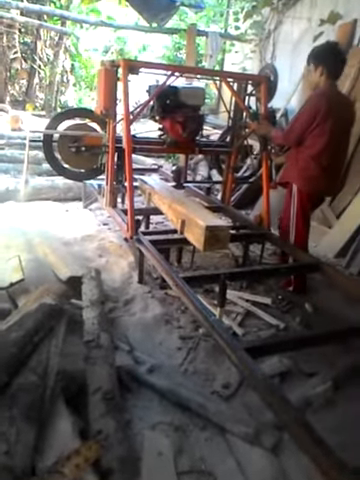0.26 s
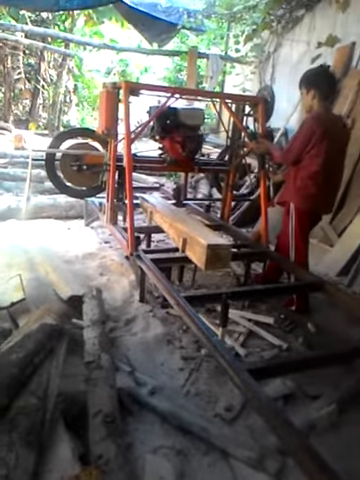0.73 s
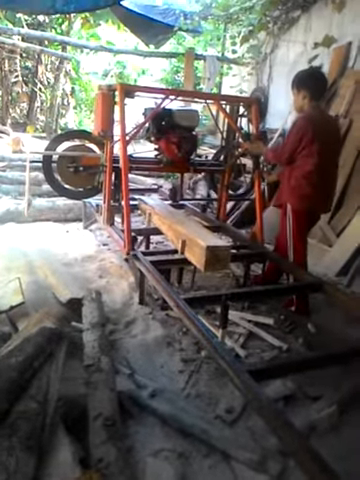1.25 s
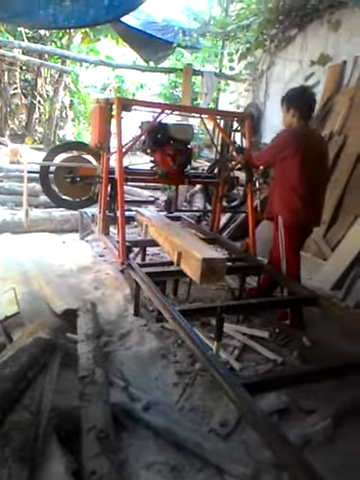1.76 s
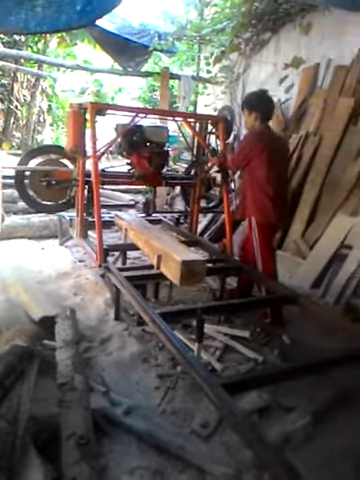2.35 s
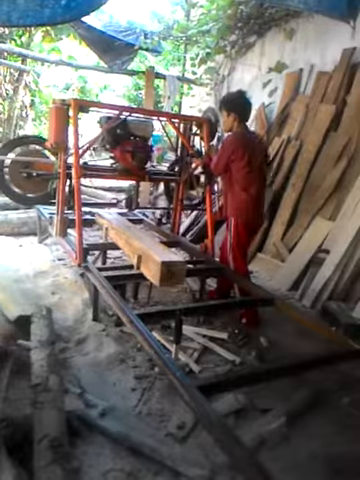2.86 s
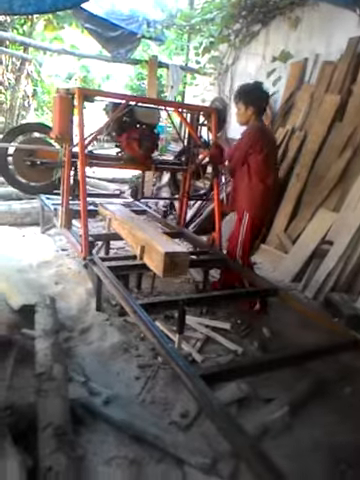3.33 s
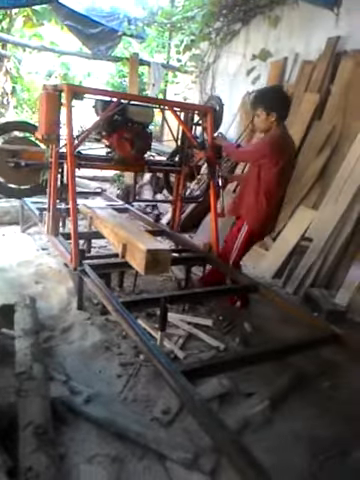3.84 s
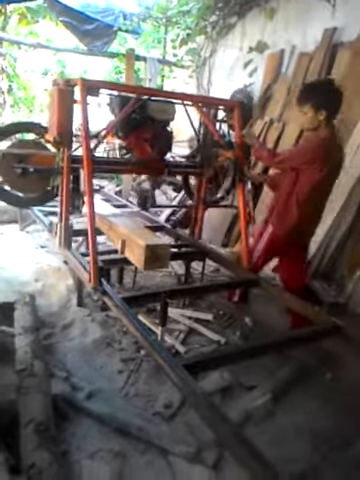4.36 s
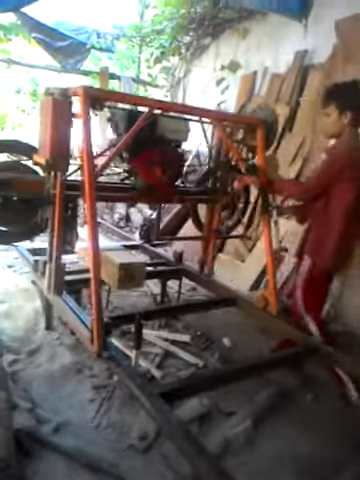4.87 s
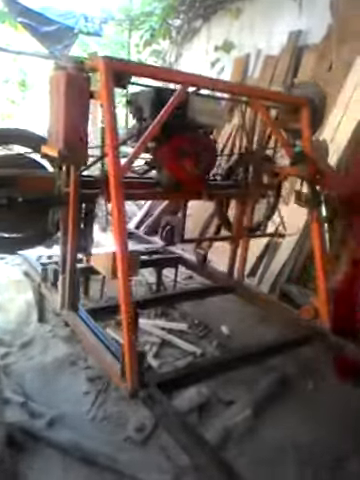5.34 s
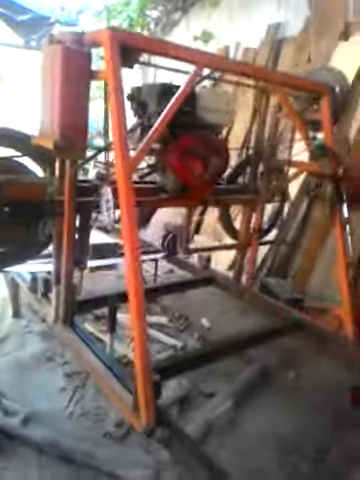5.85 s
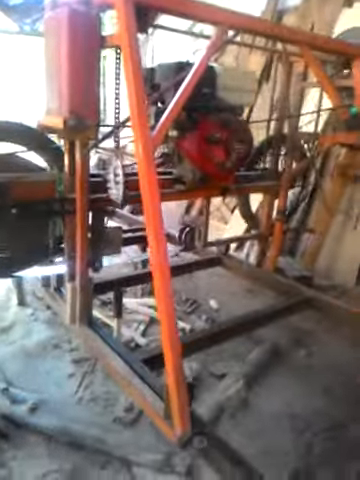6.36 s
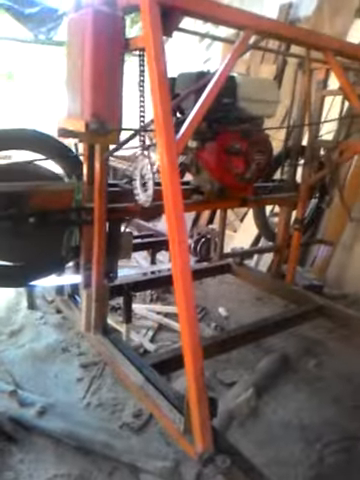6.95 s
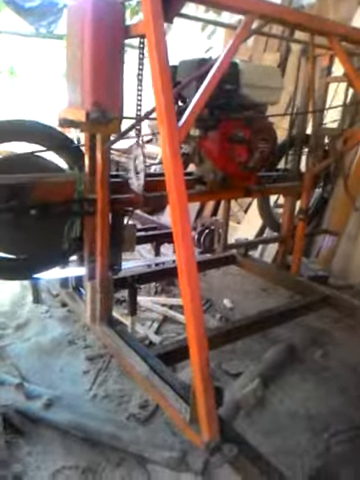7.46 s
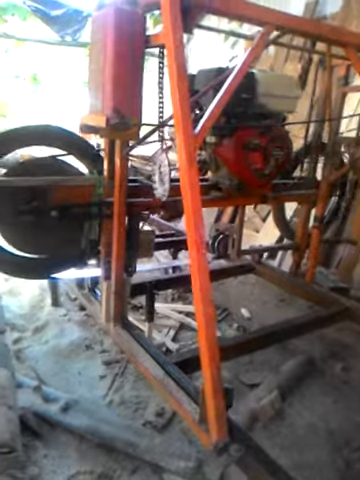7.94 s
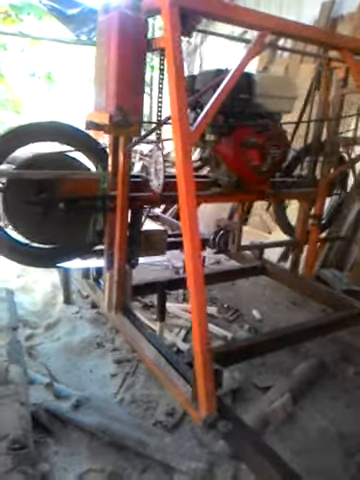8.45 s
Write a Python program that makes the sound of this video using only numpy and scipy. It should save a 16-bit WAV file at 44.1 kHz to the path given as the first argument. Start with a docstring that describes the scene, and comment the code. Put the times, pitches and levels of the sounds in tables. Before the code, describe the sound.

A thin high hiss of running steel band pulses several times a second over a low engine purr. The engine briefly revs, then eases off. Guide scrapes, a faint whine and a hollow rasp join as the machine rolls nearer, the squeal peaking harsh and bright around five seconds. It ends beside a single close microphone, pulsing more slowly, with chuffs, metallic ringing and soft frame knocks.

```python
"""In a shed, a homemade band sawmill winds down and rolls its carriage up to the microphone.
Coloured noise makes the steel band hiss and squeal through its guides, surging on every lap; bending
modes ring, guides scrape and whine, and a hollow rasp rises and sinks. Summed cosines make the petrol
engine pull, then resonant filters turn puffs into shut-throttle chuffs. Low noise rumbles the frame."""
import sys
import numpy as np
from scipy import signal
from scipy.fft import rfft, irfft
from scipy.io import wavfile
from scipy.ndimage import uniform_filter1d, minimum_filter1d

SR = 44100
rng = np.random.default_rng(int(sys.argv[2]) if len(sys.argv) > 2 else 0)


def persist_wave(psi):
    """Save psi, clipped to +-1, as 16-bit WAV."""
    counts = np.round(np.clip(psi, -1, 1) * 32767).astype(np.int16)
    wavfile.write(sys.argv[1], SR, np.atleast_2d(counts).T)


N = 383669

# Speed of the machine: (time [s], engine firings [per s], laps of the band [per s])
MACHINE_SPEED = [(0, 28.24, 6.29), (1.15, 27.92, 6.15), (1.65, 29.77, 6.555), (2.5, 26.55, 6.014),
                 (3.5, 23.96, 5.282), (5, 22.16, 5.019), (6.5, 20.19, 4.514), (7.5, 20.2, 4.278),
                 (8.7, 18.71, 4.259)]
# Place of the saw as heard from the microphone: (time [s], place [0 far, 1 facing the band, 2 beside the
# frame])
SAW_PLACE = [(0, 0), (3, 0), (3.7, .62), (4.3, 1), (5.35, 1), (5.9, 1.5), (7.1, 2.05), (8.7, 1.9)]

# Squeal of the band, following the engine at first, then rising up close: (time [s], level [dB])
SQUEAL_LEVEL = [(0.0, -27.5), (1.42, -23.5), (2.1, -27.5), (3.05, -26.5), (3.5, -24.5), (4.03, -19),
                (4.26, -19), (4.4, -15.5), (4.85, -12.0), (5.52, -11), (5.62, -14), (6.3, -13), (6.8, -11),
                (6.93, -16), (7.88, -17.5), (8.03, -16.0), (8.25, -18.0), (8.7, -16.0)]
# Pressure of the contact, relative to the squeal: (time [s], grinding [dB], fizz of the teeth [dB])
CONTACT_PRESSURE = [(0, -9, -13), (1.4, -10, -12), (3.1, -6.5, -11.5), (4.4, -8.5, -10.5), (4.9, -8.5, -10),
                    (7.3, -12, -11), (8.2, -8.7, -8), (8.7, -10.5, -11)]
# Hiss of the band from each of the three places: (frequency [Hz], relative density [dB per Hz])
HISS_FAR = [(100, -22.5), (300, -16), (520, -14.5), (750, -15), (1000, -10), (1750, -10), (2500, -17.5),
            (3800, -12), (4800, -10), (5400, -1), (6400, 0.5), (7300, -6.5), (9700, -21.5), (15500, -25)]
HISS_FACING = [(100, -31.5), (500, -25), (1000, -23.5), (1950, -11), (2500, -19.5), (3300, -14),
               (3700, -20), (4800, -8.5), (5300, -1.5), (6200, -2), (7800, -7.5), (8400, -14.5),
               (9800, -20.5), (15500, -21)]
HISS_BESIDE = [(100, -28.5), (800, -30), (1900, -20.5), (2800, -22.5), (3700, -17.5), (4800, -18.5),
               (5300, -7.5), (6250, -7.5), (6800, -10), (7600, -8.5), (8250, -21), (9100, -12.5),
               (10800, -17.5), (12000, -27.5), (15300, -17.5)]
# Resonances of the band heard from afar: (frequency [Hz], width [Hz], relative level [dB])
BAND_MODES_FAR = [(1680, 74, -10.5), (3170, 120, -19), (6530, 140, 1.5), (7330, 170, -5.5), (7970, 110, -9),
                  (9100, 340, -18)]
# Resonances of band and frame from close by: (frequency [Hz], width [Hz], relative level [dB])
BAND_MODES_NEAR = [(1990, 77, -16.5), (2230, 45, -14), (2270, 36, -20), (3060, 40, -8), (3530, 87, -6),
                   (3694, 24, -2), (3930, 100, -9), (4100, 110, -14), (4500, 97, -11), (5203, 230, -0.5),
                   (5540, 45, 4), (5816, 130, 1.5), (6055, 70, 7), (6260, 94, -1), (7200, 88, -2),
                   (7610, 42, -15), (7560, 120, -11), (7910, 33, -1.5), (8460, 36, -4.5), (8700, 210, -13),
                   (9020, 190, -5), (10840, 430, -13), (11750, 130, -18), (12100, 120, -21),
                   (13130, 230, -14), (13900, 200, -34), (15050, 400, -22)]
# Resonances that carry only to the front: (frequency [Hz], width [Hz], relative level [dB])
BAND_MODES_FACING = [(2070, 60, -16), (2834, 130, -12), (3050, 60, -10.5), (3520, 130, -6.5),
                     (3840, 88, -2.5), (4330, 100, -5), (4660, 94, -8.5)]
WELD_SURGE_DB, HALF_LAP_SURGE_DB = (1.16, 4), (0.94, 1.1)  # each (far away, beside the frame)

# Low bending ring of the band: (time [s], level [dB])
RING_LEVEL = [(1.2, -60), (1.7, -39), (3.1, -37.5), (3.3, -29), (4.1, -27.5), (4.8, -21.5), (5.45, -23.5),
              (5.9, -38), (6.75, -26), (7.6, -29), (8.7, -31)]
# Flares (+) and stalls (-) of the ring: (time [s], change [dB], half length [s])
RING_FLARES = [(3.18, 7.5, 0.026), (3.27, -5, 0.029), (3.665, 4, 0.017), (3.733, -6, 0.053),
               (4.3, -6, .015), (4.762, 2.5, .02), (6.28, 7, 0.018), (6.649, 9.5, .03), (7.003, -9, 0.092),
               (7.29, 0, 0.021), (7.627, 5, 0.032), (7.86, -3.5, 0.044), (7.995, 4.5, .02),
               (8.36, 4.5, 0.018)]
# Bending modes: (frequency [Hz], width [Hz], far [dB], facing [dB], beside [dB]), levels relative
BENDING_MODES = [(1270, 50, -18, -2, 12), (1319, 80, -14, 3, 1), (1445, 270, 1, -7, -54),
                 (1624, 70, 7, 2.5, -10), (1753, 124, -2, -1.5, -6)]

# Scrapes of the band on a guide: (time [s], peak level [dB], half length [s])
GUIDE_GRAZES = [(3.153, -27, 0.018), (3.202, -20.5, 0.016), (3.57, -30, 0.033), (4.035, -23.5, 0.035),
                (4.349, -18.5, .03)]
# Resonances of the grazed guide: (frequency [Hz], width [Hz], relative level [dB])
GUIDE_MODES = [(2860, 130, -16), (3550, 100, 7), (4120, 160, 5.5), (4660, 180, 2)]
# Whines of a guide, before their flutter: (start [s], end [s], frequency [Hz], level [dB])
GUIDE_WHINES = [(.15, .7, 4200, -36), (2.5, 3.2, 4200, -37), (3.9, 4.69, 4140, -29), (6.3, 8.7, 4415, -34)]
WHINE_FADE_S, WHINE_WIDTH_HZ = .2, 135
# Hollow rasp, before its flutter: (time [s], centre frequency [Hz], level [dB])
RASP_PATH = [(0, 600, -57), (1.3, 626, -45), (1.85, 930, -45.5), (3.9, 934, -50), (4.35, 870, -33.5),
             (5.2, 706, -34), (5.9, 596, -45.5), (8.7, 604, -48.5)]

# Exhaust, loud under throttle and again close to the engine: (time [s], level [dB])
EXHAUST_LEVEL = [(0, -40.5), (1.3, -37), (1.68, -47.5), (3.1, -44.5), (4.2, -49), (4.9, -34.5), (5.35, -35),
                 (5.7, -41), (6.65, -37.5), (7.75, -48.5), (8.0, -37.5), (8.7, -45)]
# Throttle: (time [s], share of clean firing [dB], tilt of the pulses [dB per octave])
THROTTLE_MIX = [(0, -1.5, -1), (1.0, -1.5, -.5), (1.25, -2, 1), (1.5, 3, -0.5), (1.67, -1, -8),
                (1.78, -6.5, -7.5), (3.5, -15.5, -9.5), (5.3, -12, -9), (6.3, -15, -3)]
# Exhaust harmonics under throttle: (multiple of the firing rate, level before the tilt [dB])
FIRING_ORDERS = [(2, -30), (4, -22), (5, -2.5), (7, -28), (8, -28), (9, -4), (10, 0), (11, -21), (12, -15),
                 (13, -5.5), (15, 0.5), (16, -7), (17, -7), (18, -14), (19, -5), (21, -9)]
# Silencer resonances, throttle shut:
# (frequency [Hz], width setting [Hz], far [dB], facing [dB], beside [dB]), levels relative
SILENCER_MODES = [(112.5, 7.5, -4, -3, -11), (144, 44, -2, -23, -9), (199, 42, -8, -18, -10),
                  (281.4, 21, 8.5, -16, 6), (321.4, 50, -27, 8.5, 12.5), (361, 55, -30, 1, -16),
                  (415, 23, 8.5, -6, 4), (636, 77, -31, -3, -9)]

# Dull knocks, hums and rings of the frame, and a brief engine hum near 109 Hz: # (time [s], frequency [Hz],
# width [Hz], peak level [dB], half length [s])
FRAME_KNOCKS = [(3.28, 415, 18, -44, 0.079), (3.602, 412, 15, -38, 0.083), (3.857, 203, 56, -48, .12),
                (5.247, 109, 9.3, -45, 0.2), (6.17, 52, 25, -44, .04), (6.68, 190, 130, -37.5, 0.051),
                (7.4, 414, 40, -40, 0.053), (7.766, 58, 25, -43, .03), (8.25, 1075, 150, -41, 0.45),
                (8.508, 2490, 230, -33, 0.27), (8.64, 274, 46, -33.5, 0.085)]
# Colour of the frame's steady rumble: (frequency [Hz], relative density [dB per Hz])
RUMBLE_COLOUR = [(20, -21), (35, -11), (55, -1), (90, 6), (130, -5), (200, 0), (300, 1), (600, -22)]
# Carriage rolling along its rails, before the lap wobble: (start [s], end [s], level [dB])
CARRIAGE_ROLLS = [(4.72, 6.22, -48.5), (6.55, 6.78, -45), (7.42, 7.55, -46)]
# Colour of the rolling: (frequency [Hz], relative density [dB per Hz])
ROLLING_COLOUR = [(20, -13.5), (35, -14), (55, -1), (85, 7), (120, -10), (200, -11), (400, -16), (800, -45)]
ROLL_FADE_S = 0.043
SHAKE_FAR_DB, SHAKE_NEAR_DB = -52.5, -52  # rumble of the frame, before its wobble
WOBBLE_DB = 1  # depth of the shake that the wheels give the frame once a lap

CEILING, EDGE_HZ = .92, 15560  # limiter ceiling [full scale], top of the sound [Hz]
SIZE, HOP = 4096, 1024  # noise frames [samples]
TIME = np.arange(N) / SR
FRAMES = np.arange(N // HOP + 5) * HOP / SR
BINS = np.fft.rfftfreq(SIZE, 1 / SR)


def amp(db):
    """Decibels to gain."""
    return 10 ** (np.asarray(db) / 20)


def evened(x):
    """Scales to rms 1."""
    return x / np.sqrt(np.mean(x ** 2) + 1e-20)


def steadied(x, size):
    """Friction holds a vibration near one strength: evens out its level over size samples."""
    strength = uniform_filter1d(uniform_filter1d(x ** 2, size), size)
    return x / np.sqrt(abs(strength) + 1e-12)


def follow(rows, t):
    """Each column of a curve at the times t."""
    s, *columns = np.transpose(rows)
    return [np.interp(t, s, c) for c in columns]


def by_place(far, near):
    """Glides from the far value to the near one as the saw comes close."""
    place, = follow(SAW_PLACE, TIME)
    return np.interp(place, [0, 2], [far, near])


def swell(s, half):
    """A smooth rise and fall around the moment s."""
    return np.exp(-((TIME - s) / half) ** 2)


def held(start, end, fade):
    """Fades in at start, holds, and fades out at end."""
    return (np.tanh((TIME - start) / fade) - np.tanh((TIME - end) / fade)) / 2


def bump(turns, at, width):
    """A smooth bump once in every turn."""
    distance = (turns - at + .5) % 1 - .5
    return np.exp(-(distance / width) ** 2)


def wander(rate_hz):
    """Slow random drift of rms 1, fading out above the given rate."""
    hz = np.fft.rfftfreq(N, 1 / SR)
    size = np.searchsorted(hz, 2 * rate_hz)
    spectrum = rfft(rng.standard_normal(2 ** 13))[:size]
    slow = irfft(spectrum / (1 + (hz[:size] / rate_hz) ** 4), 2 ** 13)
    return evened(np.interp(TIME, np.linspace(0, TIME[-1], len(slow)), slow))


def colour(points):
    """Power per bin of a noise colour, drawn between points on a log frequency axis."""
    hz, db = np.transpose(points)
    return amp(np.interp(np.log(BINS + 1), np.log(hz), db)) ** 2


def peak(hz, width):
    """Power per bin of a resonance with steep skirts."""
    return 1 / (1 + 2 * ((BINS - hz) / width) ** 2) ** 2


def ringing(modes):
    """Power per bin of a set of resonances."""
    return sum(amp(db) ** 2 * peak(hz, width) for hz, width, db in modes)


def noise(power):
    """Noise of steady rms 1 whose colour follows power (frames x bins)."""
    a, b = rng.standard_normal((2, len(FRAMES), len(BINS)))
    z = (a + 1j * b) * np.sqrt(power / power.sum(-1, keepdims=True))
    return evened(signal.istft(z.T, nperseg=SIZE, noverlap=SIZE - HOP)[1][:N])


def along_path(powers):
    """Blends the colours of the three places as the saw comes close."""
    place, = follow(SAW_PLACE, FRAMES)
    place = np.clip(place, 0, 2)[:, None]
    return sum(np.maximum(1 - abs(place - k), 0) * p / p.sum() for k, p in enumerate(powers))


def moving_modes(rows):
    """Resonances whose strengths depend on the place."""
    hz, width, *levels = np.transpose(rows)
    return along_path([ringing(zip(hz, width, db)) for db in levels])


def reflections(strength, longest_s, drift_s, count=24):
    """Echoes off floor, timber and frame comb the sound; the comb slides as the place changes."""
    place, = follow(SAW_PLACE, FRAMES)
    comb = 0
    for length, drift in rng.random((count, 2)):
        delay = longest_s * (.25 + .75 * length) + drift_s * (drift - .5) * place
        comb = comb + np.cos(2 * np.pi * np.outer(delay, BINS))
    return np.exp(strength * comb * np.sqrt(2 / count))


def patches(depth_db, order=3, size=4):
    """Single modes flare up and die, in patches of order frames by size bins."""
    field = rng.standard_normal((len(FRAMES), len(BINS)))
    smooth = uniform_filter1d(uniform_filter1d(field, order, 0), size, 1)
    return amp(depth_db * evened(smooth)) ** 2


def band_hiss(laps):
    """Steel sliding through the guides: a bright squeal that surges when the weld passes."""
    squeal_db, = follow(SQUEAL_LEVEL, TIME)
    grind_db, fizz_db = follow(CONTACT_PRESSURE, FRAMES)
    near_modes = ringing(BAND_MODES_NEAR)
    far = colour(HISS_FAR) + ringing(BAND_MODES_FAR)
    facing = colour(HISS_FACING) + ringing(BAND_MODES_FACING) + amp(-6.5) ** 2 * near_modes
    beside = colour(HISS_BESIDE) + near_modes
    power = along_path([far, facing, beside])
    power = power * reflections(strength=0.39, longest_s=.035, drift_s=0.001187)
    power = power * patches(depth_db=3.0)

    ranges_hz = [(2200, 4500), (4500, 8500), (9500, 15500)]
    grind, squeal, fizz = (power[:, (BINS > lo) & (BINS < hi)].sum(1) for lo, hi in ranges_hz)
    # the pressure of the contact weights the ranges below and above the squeal
    grind_gain = (amp(grind_db) ** 2 * squeal / grind)[:, None]
    fizz_gain = (amp(fizz_db) ** 2 * squeal / fizz)[:, None]
    power = power * grind_gain ** np.interp(BINS, [1470, 2270, 4470, 5340], [0, 1, 1, 0])
    power = power * fizz_gain ** np.interp(BINS, [7500, 10000], [0, 1])
    # the level curve is that of the squeal range, so the whole spectrum scales up from it
    whole = np.interp(TIME, FRAMES, np.sqrt(power.sum(1) / squeal))

    weld_db = by_place(*WELD_SURGE_DB) * bump(laps, 0.66, 0.12)
    half_lap_db = by_place(*HALF_LAP_SURGE_DB) * bump(laps, 0.24, 0.17)
    flutter_db = 0.56 * wander(57) + 0.85 * wander(10.5)
    surge = steadied(amp(weld_db + half_lap_db + flutter_db), size=7000)
    return amp(squeal_db) * whole * surge * steadied(noise(power), size=2500)


def band_ring(laps):
    """The band's bending modes chatter, most at each half lap, and take turns to flare up."""
    ring_db, = follow(RING_LEVEL, TIME)
    flare_db = sum(db * swell(s, half) for s, db, half in RING_FLARES)
    lap_db = 2.2 * bump(laps, 0.65, 0.19) + 2.3 * bump(laps, 0.2, 0.095)
    chatter = evened(amp(lap_db + 2.04 * wander(29)))
    power = moving_modes(BENDING_MODES) * patches(depth_db=4.0) * patches(depth_db=3.5, size=14)
    return amp(ring_db + flare_db) * chatter * steadied(noise(power), size=1200)


def grazes():
    """The band grazes a guide: short scrapes of noise through the guide's resonances."""
    stroke = sum(amp(db) * swell(s, half) for s, db, half in GUIDE_GRAZES)
    return stroke * noise(ringing(GUIDE_MODES))


def guide_whine():
    """A guide whines now and then: narrow noise with a fluttering level."""
    whine = 0
    for start, end, hz, db in GUIDE_WHINES:
        whine = whine + amp(db) * held(start, end, WHINE_FADE_S) * noise(peak(hz, WHINE_WIDTH_HZ))
    return amp(2.5 * wander(17)) * whine


def rasp():
    """A hollow band of noise that rises, then sinks, as wide as 0.18 of its frequency."""
    hz, _ = follow(RASP_PATH, FRAMES)
    _, db = follow(RASP_PATH, TIME)
    power = peak(hz[:, None], 0.18 * hz[:, None]) * patches(depth_db=7.0)
    return amp(db + 2.0 * wander(38)) * noise(power)


def engine(cycles):
    """Clean firing pulses under throttle, uneven chuffs through the silencer without it."""
    exhaust_db, = follow(EXHAUST_LEVEL, TIME)
    clean_db, tilt_db = follow(THROTTLE_MIX, TIME)
    clean = np.minimum(amp(clean_db), .97)
    turns = cycles - .85 + .003 * wander(13)
    firing = np.zeros(N)
    for k, db in FIRING_ORDERS:
        # the pipe delays high orders, which smears each pulse
        phase = round(k) * turns - .012 * (k - 11) ** 2
        firing += amp(db + tilt_db * np.log2(k / 10)) * np.cos(2 * np.pi * phase)
    firing = firing / np.sqrt(sum(amp(db) ** 2 for _, db in FIRING_ORDERS) / 2)
    pops = evened(bump(cycles, .66, 0.011))
    puffs = evened((0.2 + bump(cycles, 0.74, 0.17)) * rng.standard_normal(N))
    chuffs = silencer((0.091 * pops + puffs) * amp(2.2 * wander(14)))
    return amp(exhaust_db) * (clean * firing + amp(-2.0) * np.sqrt(1 - clean ** 2) * chuffs)


def silencer(drive):
    """The silencer's resonances ring after each puff; which ones carry depends on the place."""
    place, = follow(SAW_PLACE, TIME)
    out = np.zeros(N)
    for hz, width, *levels_db in SILENCER_MODES:
        b, a = signal.iirpeak(hz, hz / (1.11 * width), SR)
        rung = signal.lfilter(b, a, signal.lfilter(b, a, drive))  # twice, for steeper skirts
        out += amp(np.interp(place, range(3), levels_db)) * evened(rung)
    return steadied(out, size=7000)


def knocks():
    """Dull knocks, brief hums and rings of the frame, and a brief engine hum: narrow noise in smooth swells."""
    out = np.zeros(N)
    for s, hz, width, db, half in FRAME_KNOCKS:
        out += amp(db) * swell(s, half) * steadied(noise(peak(hz, width)), size=3000)
    return out


def frame(laps):
    """The steel frame rumbles with the wheels as the carriage rolls along its rails."""
    shake_db = by_place(SHAKE_FAR_DB, SHAKE_NEAR_DB) + 1.0 * wander(7.9)
    shake = amp(shake_db) * noise(colour(RUMBLE_COLOUR) * patches(depth_db=0.5))
    roll_gain = sum(amp(db) * held(start, end, ROLL_FADE_S) for start, end, db in CARRIAGE_ROLLS)
    roll = roll_gain * noise(colour(ROLLING_COLOUR))
    wobble = evened(amp(WOBBLE_DB * bump(laps, .66, 0.16)))
    return (shake + roll) * wobble


def scene():
    """The engine drives the band; one microphone feeds both channels."""
    cycles, laps = np.cumsum(follow(MACHINE_SPEED, TIME), axis=1) / SR
    band = band_hiss(laps) + band_ring(laps) + grazes() + guide_whine() + rasp()
    mill = band + engine(cycles) + knocks() + frame(laps)
    return np.array([mill, mill])


def record(dry):
    """A fast limiter holds the highest peaks down; then a low-pass sets the top of the sound."""
    room = np.minimum(CEILING / (abs(dry).max(0) + 1e-9), 1)
    lowest = minimum_filter1d(room, size=240)
    gain = uniform_filter1d(uniform_filter1d(lowest, size=120), size=120)
    edge = signal.firwin(601, EDGE_HZ, window=("kaiser", 9), fs=SR)
    return signal.oaconvolve(dry * gain, edge[None], "same")


dry = scene()
out = record(dry)
persist_wave(out)
```